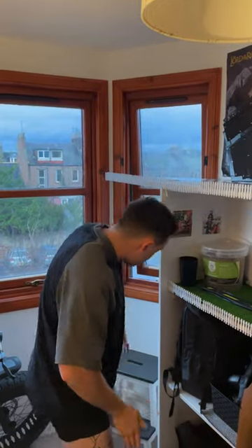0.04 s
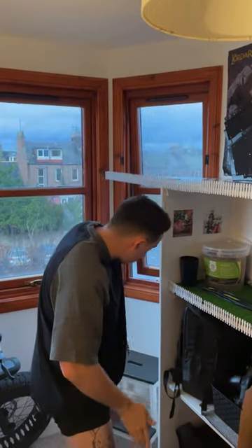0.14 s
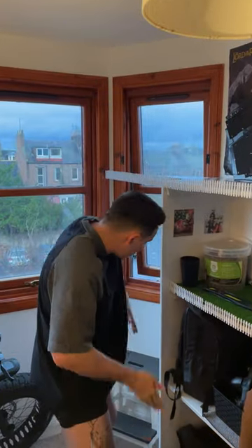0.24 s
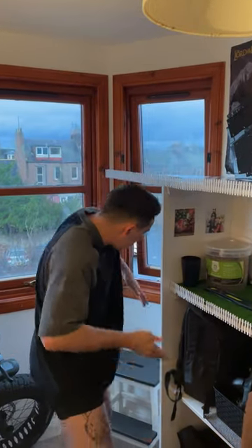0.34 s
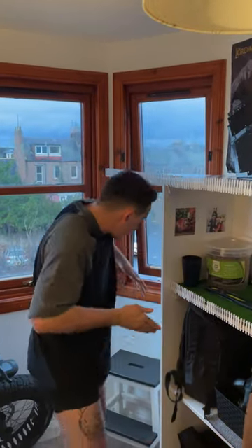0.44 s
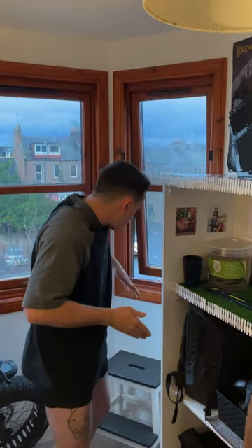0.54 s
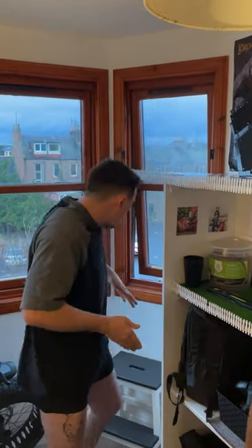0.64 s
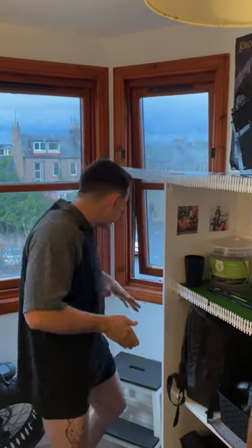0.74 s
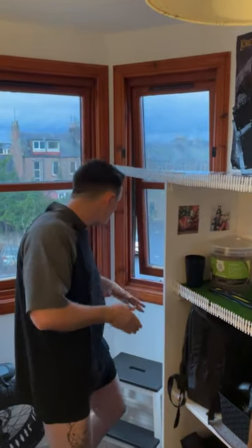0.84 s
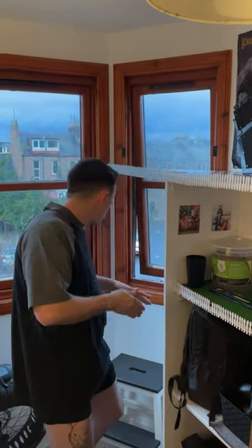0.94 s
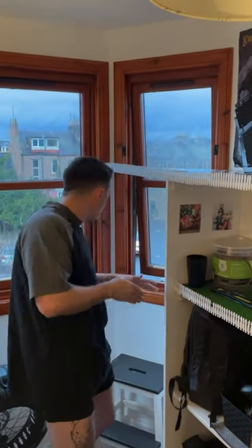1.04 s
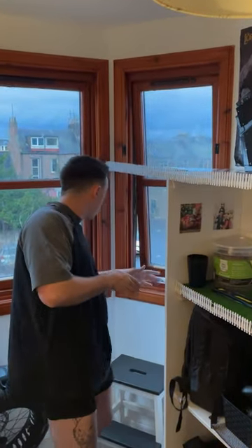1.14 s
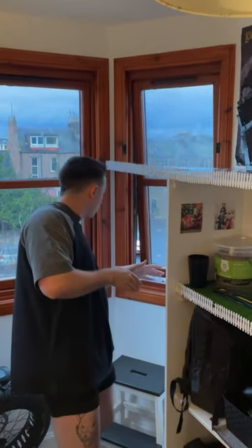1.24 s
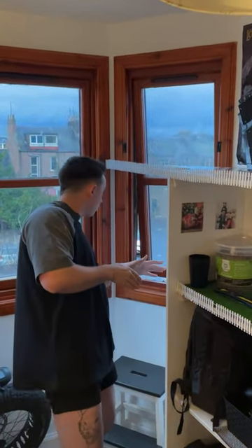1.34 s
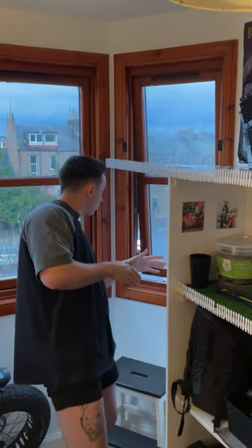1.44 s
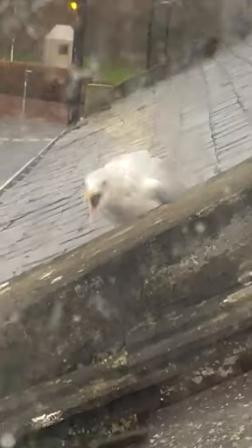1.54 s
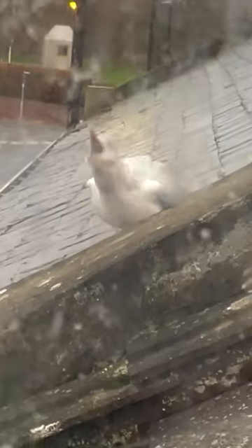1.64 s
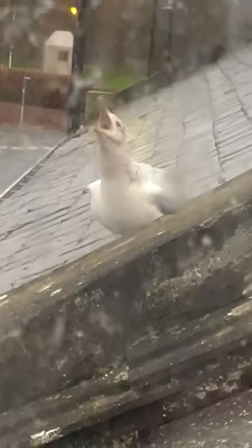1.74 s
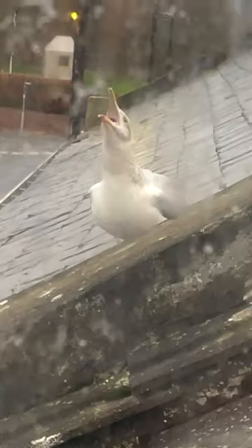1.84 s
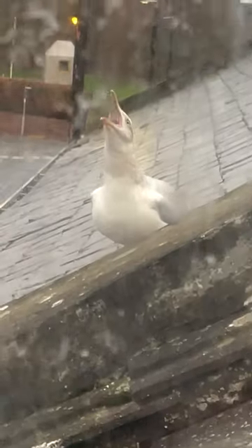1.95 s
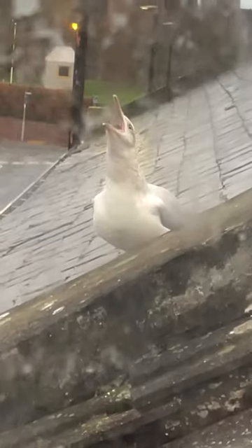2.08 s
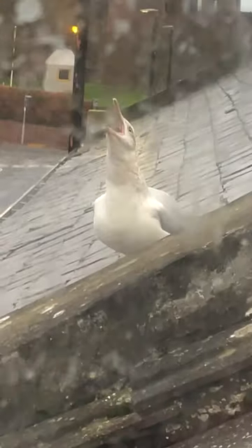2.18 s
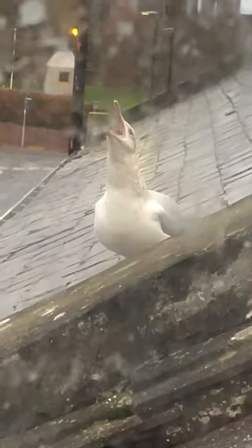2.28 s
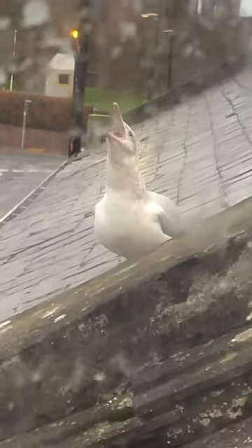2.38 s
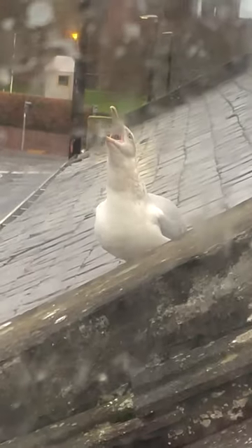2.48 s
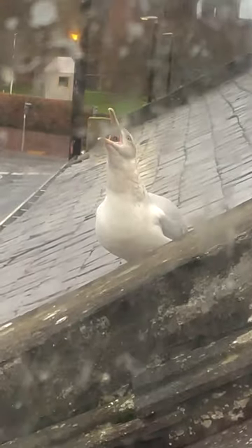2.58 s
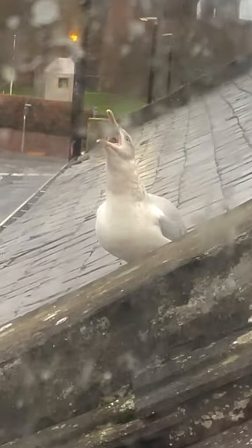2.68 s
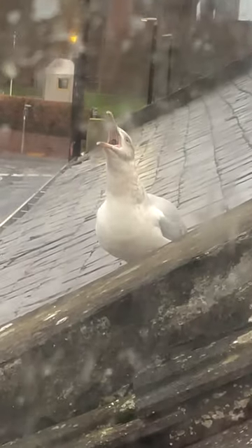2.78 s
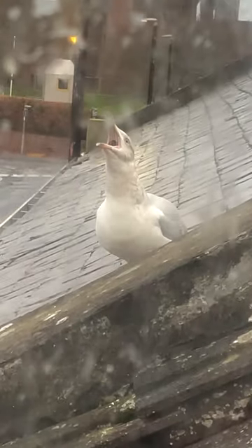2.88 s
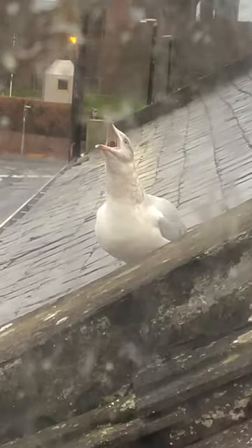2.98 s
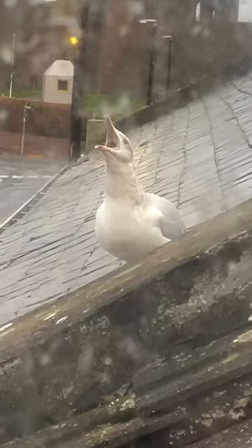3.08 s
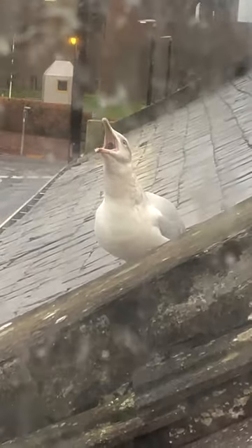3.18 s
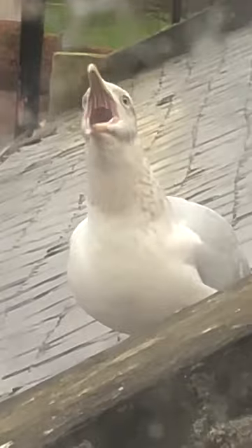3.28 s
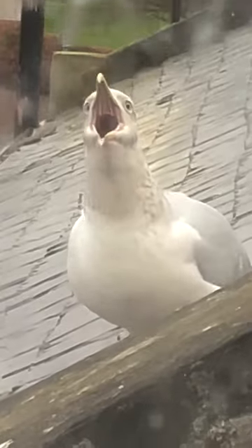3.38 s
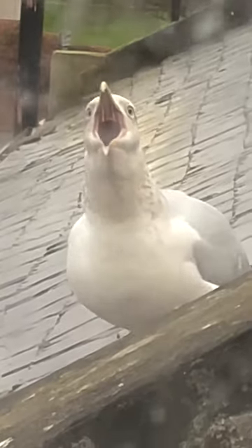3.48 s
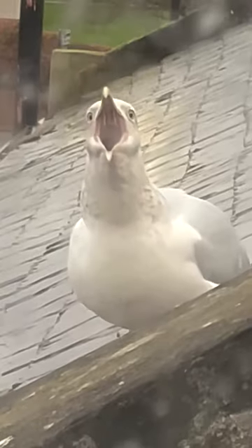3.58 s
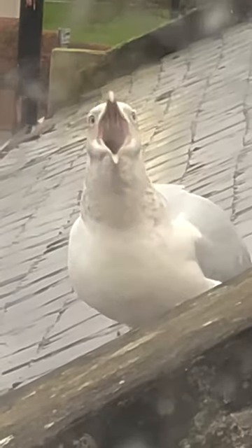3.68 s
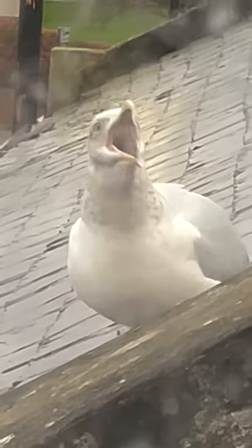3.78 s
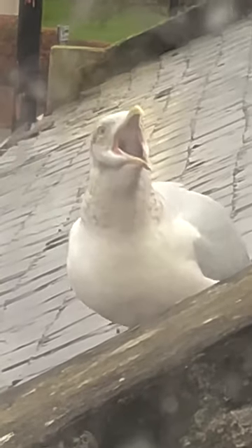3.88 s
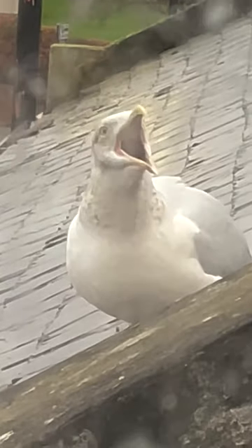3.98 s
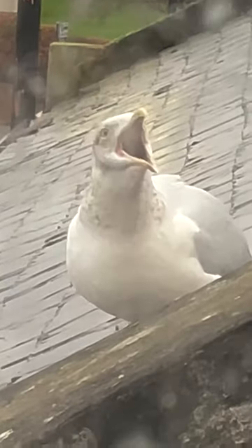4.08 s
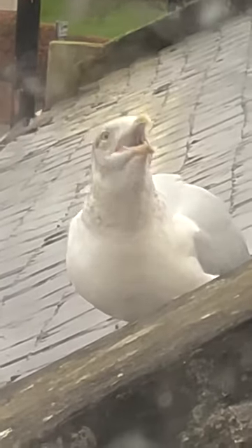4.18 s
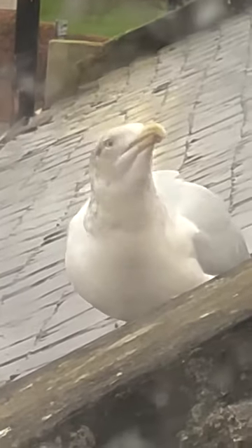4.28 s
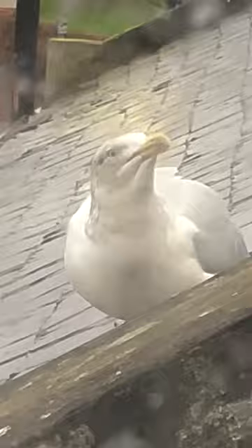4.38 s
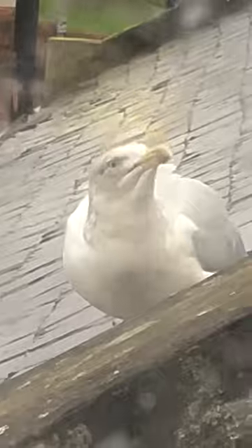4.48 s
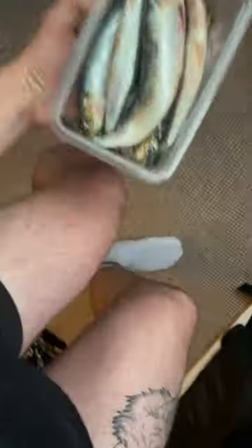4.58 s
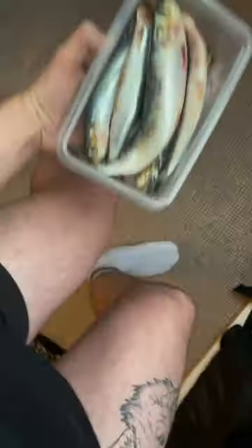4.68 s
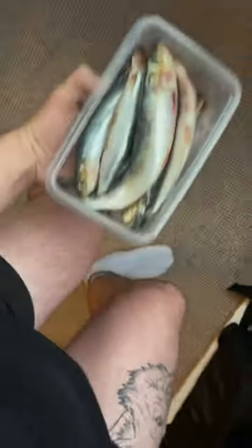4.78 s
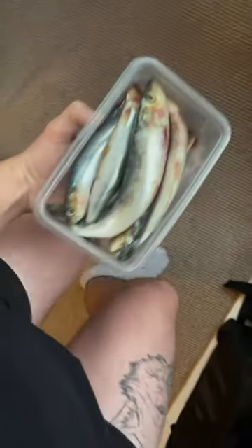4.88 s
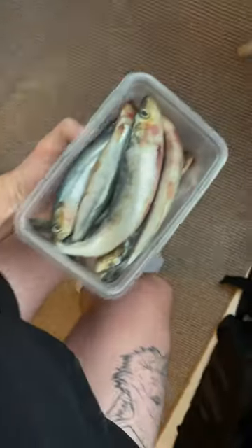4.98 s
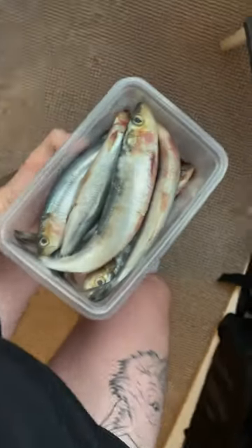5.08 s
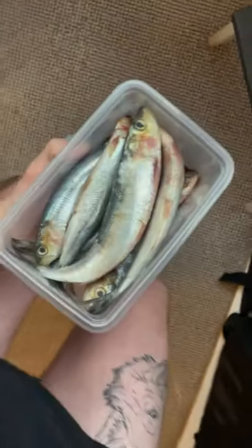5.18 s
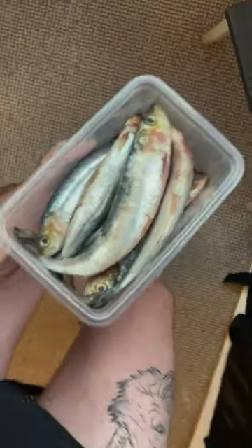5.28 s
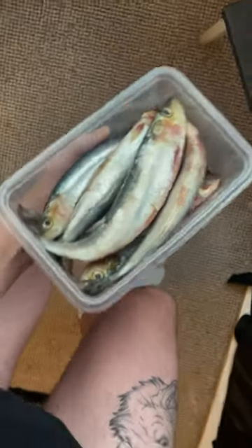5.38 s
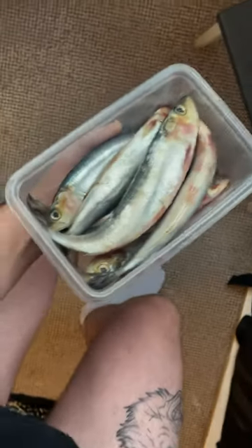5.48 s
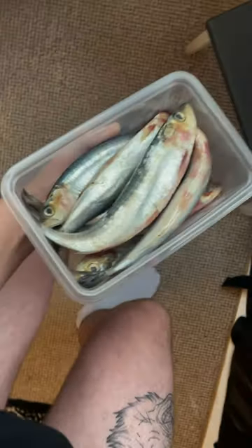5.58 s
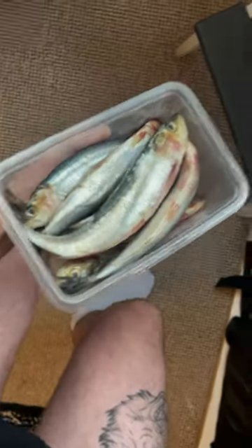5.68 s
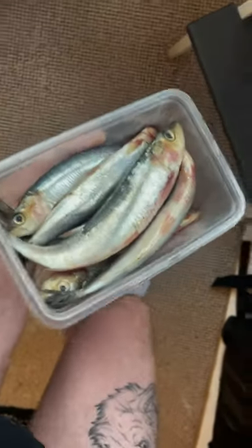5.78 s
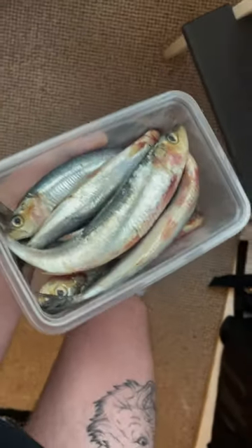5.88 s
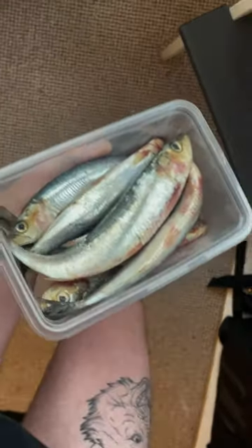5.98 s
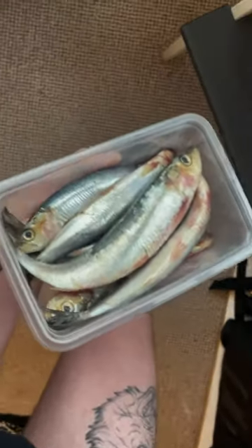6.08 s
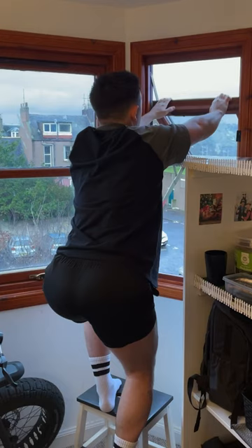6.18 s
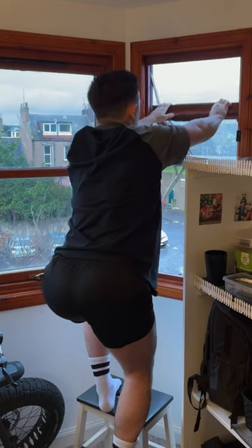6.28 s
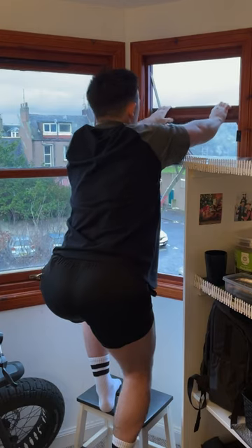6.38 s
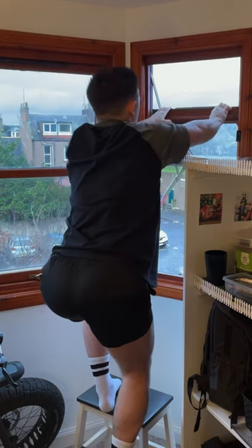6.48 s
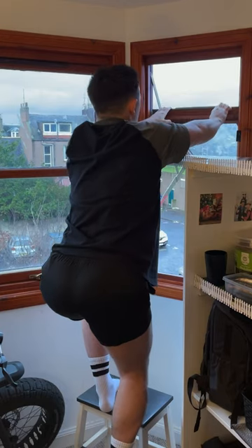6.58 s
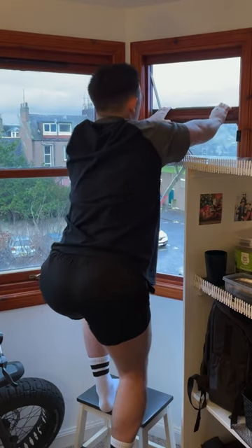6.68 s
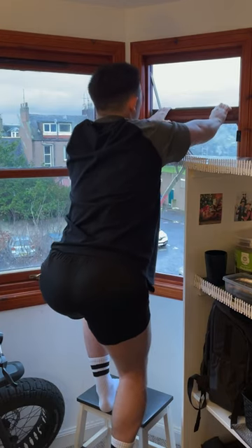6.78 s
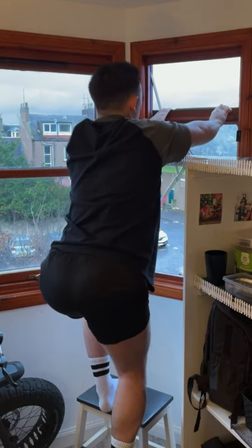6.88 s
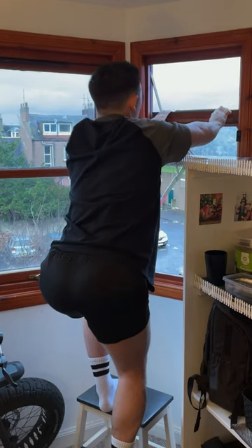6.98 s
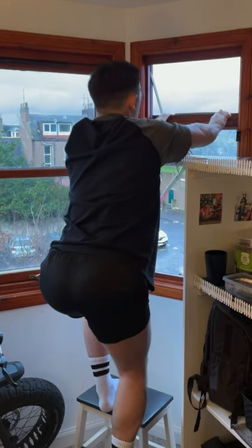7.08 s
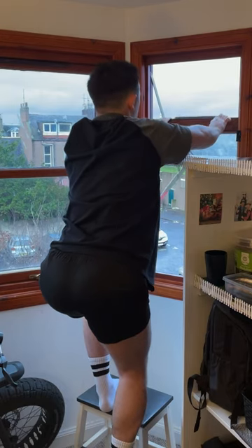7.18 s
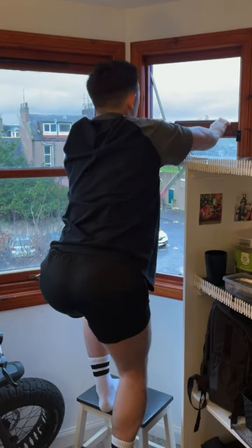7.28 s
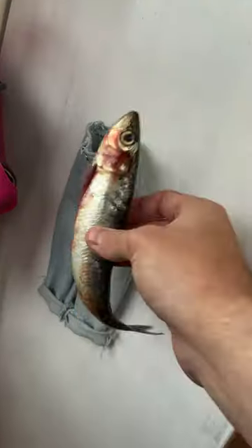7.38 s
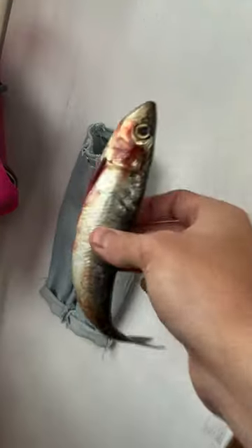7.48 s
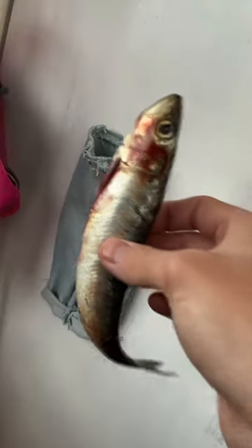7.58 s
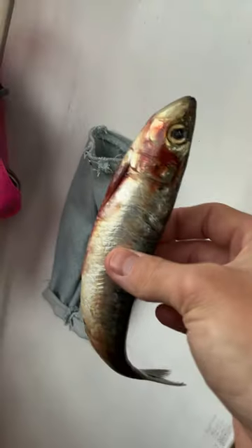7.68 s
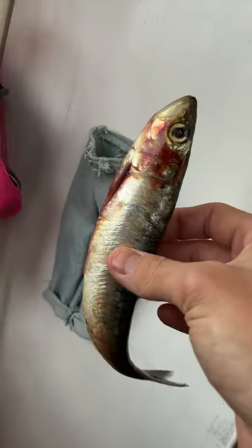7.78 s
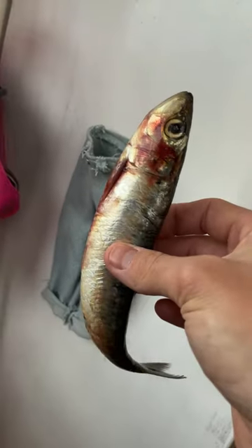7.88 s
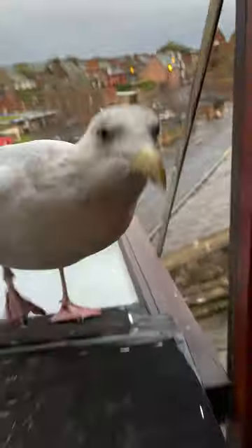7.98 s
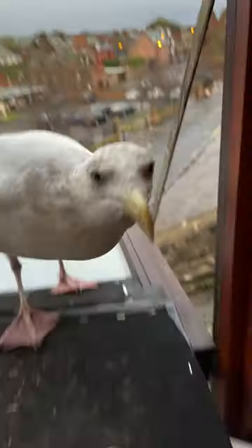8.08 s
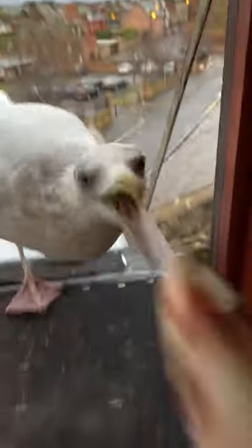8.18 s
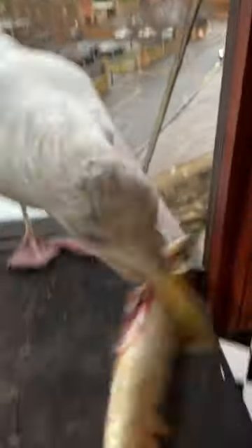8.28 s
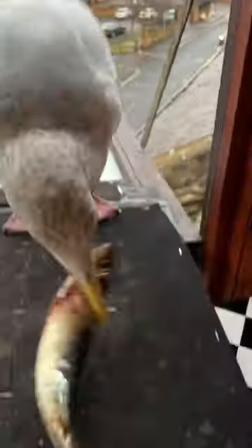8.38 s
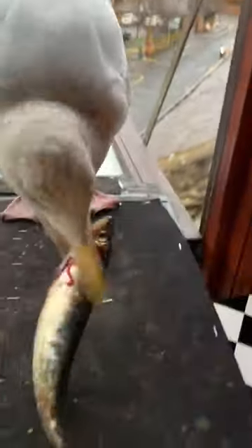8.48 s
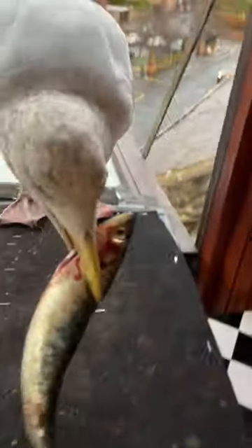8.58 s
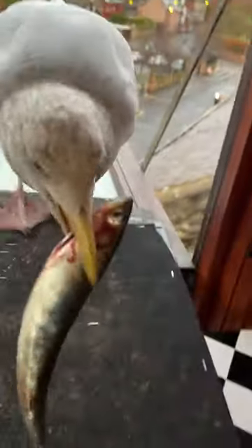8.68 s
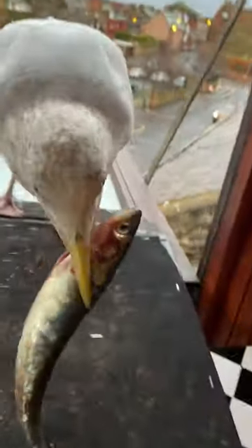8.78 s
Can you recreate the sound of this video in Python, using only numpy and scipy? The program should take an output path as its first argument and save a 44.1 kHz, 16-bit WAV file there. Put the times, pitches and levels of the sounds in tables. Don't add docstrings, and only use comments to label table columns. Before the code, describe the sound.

A phone catches low town rumble and light fabric movement in a room, then a loud gull outside yelping about four times a second, with short throaty croaks before each yelp and echoes from houses. A second gull replies more distantly and lingers after the first stops. Cloth brushes, a window frame groans and rubs open twice, then a bird snatches something with clicks, thuds and rustling at the open sill.

```python
import sys
import numpy as np
from scipy import signal
from scipy.fft import rfft, irfft, next_fast_len
from scipy.io import wavfile
from scipy.ndimage import uniform_filter1d, map_coordinates

SR = 44100
rng = np.random.default_rng(int(sys.argv[2]) if len(sys.argv) > 2 else 0)


def transcribe(u):
    v = np.clip(np.atleast_2d(u).T, -1, 1)
    q = np.round(v * 32767).astype(np.int16)
    wavfile.write(sys.argv[1], SR, q)


def attenuation_scalar(level_db):
    decades = np.asarray(level_db, float) / 20
    return 10 ** decades


N = 390285

# start, low lead-in, hold on top and sag in seconds, lead-in level in dB.
YELPS = [
    (1.621, 0.073, .024, 0.025, -32),
    (1.861, 0.06, 0.0012, 0.038, -25),
    (2.106, 0.054, 0.0011, 0.042, -25.5),
    (2.355, 0.054, .001, 0.041, -24),
    (2.61, 0.046, 0.0012, 0.039, -24),
    (2.865, 0.045, 0.00069, 0.044, -23),
    (3.131, .045, 0.00061, .044, -25.5),
    (3.419, 0.021, 0.0011, 0.049, -31),
    (3.692, 0.013, .023, 0.054, -26.5),
    (4.016, 0.013, 0.03544, 0.066, -24.5),
]
# top in Hz and in dB over the rule, collapse in seconds, collapse in dB over the rule.
EFFORTS = [
    (-30, 0, .02, -3),
    (4, 0, 0.018, -1.5),
    (5, 0, 0.015, 1.5),
    (2.5, 0, 0.0097, -0.5),
    (-1.5, 0.5, 0.033, -3),
    (3, 0.5, 0.017, 1.5),
    (5, 0.5, 0.014, 1.5),
    (4, 0, 0.022, 1),
    (-2, 0, 0.024, 2),
    (-1.5, 0, 0.051, -1),
]
# time in seconds, pitch in Hz, level in dB.
OPENING_NOTE = [
    (1.11, 1269, -26),
    (1.13, 1232, -27.5),
    (1.17, 1241, -24.5),
    (1.22, 1252, -24),
    (1.245, 1272, -31),
    (1.26, 1300, -38),
    (1.282, 1390, -36.5),
]
# time in seconds, pitch in Hz, level in dB.
SQUEAL = [
    (1.292, 1870, -43.5),
    (1.31, 1856, -41.5),
    (1.36, 1886, -52),
    (1.41, 1900, -54.5),
    (1.436, 1892, -50.5),
    (1.447, 1850, -54),
    (1.455, 1782, -38),
    (1.474, 1680, -41.5),
]
# time in seconds, pitch in Hz, level in dB.
SNAP = [
    (1.478, 1011, -30.5),
    (1.488, 976, -36),
]
# multiple of the pitch, level in dB.
SQUEAL_ORDERS = [(1, -1.5), (2, -24.5), (3, -10), (4, -18.5), (5, -16), (6, -29.5), (7, -41)]
# pitch in Hz, level in dB.
SECOND_PARTIAL = [(940, -13.5), (1040, -12.5), (1110, -8), (1200, -4), (1240, 2), (1280, 1.5), (1340, 5)]
# frequency in Hz, level in dB.
BEAK = [(2850, 8.5), (3050, 10), (3250, -15), (3400, -22.5), (3650, -20), (3850, -31.5), (4000, -35.5),
        (4400, -37), (5000, -48), (6200, -44), (7400, -37.5), (8700, -39.5), (10000, -59.5), (11200, -37.5),
        (12600, -64.5), (15000, -80)]
# time in seconds, brightness in dB.
TURN = [
    (1.2, 8.5),
    (1.26, -3.5),
    (1.65, -5),
    (1.7, -7),
    (1.72, 2.5),
    (2, 2),
    (3.2, 2),
    (3.45, 5),
    (4.1, 6.5),
]
# share of the sag from 0 to 1, pitch in Hz from the top, level in dB.
SAG = [
    (.33, -64, -14),
    (.8, -125, -14.5),
    (1, -150, -14.5),
]
# start in seconds, length in seconds, level in dB.
CROAKS = [(1.049, 0.052, -43), (1.476, 0.02, -42), (1.582, 0.041, -40), (1.82, 0.037, -36.5),
          (2.062, 0.034, -34), (2.311, 0.04, -35), (2.561, 0.045, -33.5), (2.816, 0.041, -34.5),
          (3.076, 0.048, -33.5), (3.346, 0.046, -33), (3.63, 0.039, -33.5), (3.953, 0.052, -35.5)]
# start in seconds, length in seconds, pitch in Hz, level in dB.
CATCHES = [(1.08, 0.014, 1218, -39), (1.6, .012, 1130, -42.5), (1.84, 0.01, 1202, -44.5),
           (2.085, 0.01, 1207, -41.5), (2.336, .012, 1209, -42), (2.591, 0.011, 1191, -40.5),
           (2.843, 0.013, 1170, -38), (3.105, 0.011, 1170, -38), (3.379, 0.016, 1207, -36),
           (3.659, 0.015, 1270, -29.5), (3.983, 0.017, 1305, -25.5)]
# frequency in Hz, width in Hz, level in dB.
THROAT = [(374, 47, -13.5), (1114, 55.5, 7.5), (2500, 300, -1), (3230, 480, -13)]

LOW_HZ, DIP_HZ, STRAIN_HZ, TOP_HZ, BROKEN_HZ, SPENT_HZ = 1130.3, 1093, 1232.4, 1338.7, 1046, 931
STRAIN_DB, TOP_DB, BROKEN_DB, SPENT_DB = -26, -21, -28, -38.5
FULL_LEAD_S, SCOOP_HZ, JUMP_S, BREAK_S = .018, 50, 0.0028, 0.004
HELD_DB, TIRE_HZ_PER_S, TIRE_DB_PER_S = 0.5, 440, 43.5
CATCH_RISE_HZ = 30
RASP_DB = 15.5
FLUTTER, FLUTTER_HZ = .22, 1266
FACING_DB_PER_DB = 2.5
SLACK_HZ, SLACK_DB_PER_HZ, OCTAVE_DB_PER_HZ = 1830, 0.2, 0.1219

# start in seconds, whistle in seconds, top in Hz, whistle in dB, yap in dB.
ANSWERS = [
    (2.759, 0.072, 782, -39, -45.5),
    (3.062, 0.074, 797, -39, -46.5),
    (3.365, 0.046, 764, -34, -43.5),
    (3.65, 0.051, 767, -34.5, -43),
    (3.933, 0.054, 761, -36.5, -41),
    (4.227, .053, 761, -36.5, -45.5),
    (4.526, 0.051, 759.5, -40, -48.5),
    (4.834, 0.035, 753, -44, -54.5),
]
# start and end in seconds, first and last pitch in Hz, level in dB.
WHISTLES = [
    (1.79, 1.84, 664, 714, -52.5),
    (1.86, 1.95, 726, 740, -44),
    (2.085, 2.105, 747, 740, -43),
    (2.3, 2.36, 750, 785, -45),
    (2.37, 2.41, 783, 776, -51.5),
    (2.46, 2.585, 574, 589, -41.5),
]
# start and end in seconds, first and last pitch in Hz, level in dB.
DOUBLED = [
    (1.97, 2.07, 711.3, 710, -53),
]
# multiple of the pitch, level in dB.
WHISTLE_ORDERS = [(2, -21.5), (4, -1), (6, -44.5)]
# multiple of the pitch, level in dB.
DOUBLED_ORDERS = [(1, -20), (2, 1), (3, -5), (4, -6), (5, -3.5), (6, -25.5), (8, -32), (10, -31.5),
                  (12, -36.5), (13, -32.5)]
# start and end in seconds, first and last pitch in Hz, level in dB.
GULPS = [
    (4.328, 4.353, 1134, 1037, -43),
    (4.62, 4.647, 1153, 1046, -44.5),
    (4.923, 4.948, 1136, 1020, -56.5),
]
# multiple of the pitch, level in dB.
GULP_ORDERS = [(1, 0), (2, -18), (3, -13)]
# start in seconds, length in seconds, level in dB.
GRUNTS = [
    (4.335, 0.018, -47.5),
    (4.63, 0.028, -55.5),
    (4.928, 0.017, -65),
]
SLIDE_ORDERS, SLIDE_DB = [(2, -2), (4, 1.5), (6, -22), (8, -24)], -4
CLIMB_HZ_PER_S, EASY_S = 450, 0.044
YAP_GAP_S, YAP_S, YAP_FIRST_HZ, YAP_LAST_HZ = 0.02, .04, 692, 661.5

# start and end in seconds,
# first and last pitch in Hz, level in dB.
DISTANT = [
    (.77, .96, 1906, 1956, -68.5),
    (7.59, 7.69, 4460, 4460, -87),
    (7.6, 7.69, 4320, 4300, -85.5),
    (7.8, 7.95, 1595, 1524, -67),
    (7.845, 7.885, 4270, 4330, -72.5),
    (7.88, 7.925, 4340, 4220, -76.5),
    (8.068, 8.09, 3050, 2950, -66),
    (8.07, 8.09, 4200, 4150, -76),
    (8.068, 8.088, 5560, 5520, -76),
]
# delay in seconds, level in dB.
GABLES = [
    (0.012, -25),
    (.07, -18.5),
    (0.122, -19.5),
    (.165, -22.5),
    (.195, -27.5),
]
# delay in seconds, level in dB.
TERRACES = [
    (.07, -30.5),
    (.325, -26.5),
    (.51, -31),
]
# frequency in Hz, time to fall 60 dB in seconds.
ROOFS = [(300, 0.23), (1200, 0.35), (3000, 0.18), (4400, 0.51), (5200, 0.085), (9000, 0.053)]
# frequency in Hz, level in dB.
SLATES = [(3800, -2), (4100, 11.5), (4500, 6), (4900, 6.5)]
TERRACE_OCTAVE_DB, SMEAR_S = -12, 0.018

# time in seconds, peak, thud and ring in dB, tilt in dB per octave.
TAPS = [(8.138, -33, -52, -4, 0), (8.1438, -26, -28.5, -0.5, 0.5), (8.25, -46, -60, -15, 1.5),
        (8.2568, -41.5, -16.5, 9.5, -2), (8.2691, -41.5, -21.5, 1, 0), (8.285, -54, -27, -10, 1),
        (8.2986, -28.5, -24, 6, 1.5), (8.3512, -27.5, -38, 0, -5.5), (8.3953, -38.5, -51, -17, 4.5),
        (8.4186, -51, -48, 3, -9.5), (8.4458, -39, -39, 6, 1.5), (8.5334, -53.5, -60, 0, -1.5),
        (8.5658, -41.5, -44, -2, 3), (8.579, -43.5, -58, -6, 3), (8.591, -43.5, -39, -11, 7),
        (8.6066, -41.5, -39.5, -13, 7), (8.6787, -46.5, -62, -12, 1), (8.702, -52, -52, 0.5, -5),
        (8.711, -54, -63, -12, 3), (8.7317, -46.5, -61, -17, 2.5), (8.7708, -49, -62, -4, -1),
        (8.788, -49, -60, -8, -1), (8.794, -29.5, -52, -4, -1), (8.812, -33.5, -40.5, 0.5, -0.5),
        (8.823, -43, -51, -14, 6), (8.843, -47, -55, -10, -0.5)]
# frequency in Hz, level in dB, time to fall 60 dB in seconds.
PANE = [(1170, 4, 0.032), (2580, -1, 0.02), (3300, -4, 0.013), (4200, -25, 0.016), (5500, -22, 0.0074),
        (7600, -28, 0.0053)]
# frequency in Hz, width in Hz, level in dB.
SILL = [(85.4, 36, -4.5), (133.5, 29, -2.5), (370, 55, -3), (1080, 260, -29)]
SILL_LEAN_DB, SILL_FROM_S = .9, 7.95

# start, hardest moment and letting go in seconds, frame in dB, rub in dB.
SASH = [
    (5.569, 6.223, 6.38, -34.5, -43.5),
    (6.79, 6.83, 6.74, -51.5, -85),
    (6.808, 7.285, 7.45, -37, -50.5),
]
# frequency in Hz, level in dB per Hz.
FRAME = [(60, -14.5), (140, 3.5), (175, -8), (220, 2), (290, -5.5), (350, -4.5), (520, -10), (800, -25),
         (1300, -27), (2000, -65), (9000, -100)]
# frequency in Hz, level in dB per Hz.
RUB = [(400, -12), (700, -4.5), (1330, -11), (1740, -14), (5500, -19), (8600, -22.5), (12500, -23.5),
       (14700, -42), (15500, -70)]
RELEASE_S, STOP_S = 0.21, 7.53
SASH_SHOT = slice(5 * SR, 8 * SR)

# start in seconds, length in seconds, level in dB.
CLOTH = [(.0, 0.015, -70.5), (0.082, 0.088, -70), (0.274, 0.35, -68.5), (0.366, 0.078, -59.5),
         (0.524, 0.11, -59), (0.695, 0.083, -66), (1.42, 0.0071, -55), (5.375, 0.062, -57.5),
         (5.41, 0.046, -62.5), (5.445, 0.058, -68.5), (6.574, 0.073, -64.5), (6.672, 0.069, -69),
         (6.763, 0.047, -73), (7.025, 0.021, -52.5), (8, 0.027, -78), (8.07, 0.015, -70),
         (8.133, 0.049, -49), (8.244, 0.056, -55.5), (8.299, 0.02, -38), (8.312, 0.033, -43.5),
         (8.338, 0.049, -44), (8.394, 0.058, -55.5), (8.434, 0.047, -51.5), (8.574, 0.053, -60),
         (8.748, 0.063, -56), (8.835, 0.0091, -55)]
# start in seconds, length in seconds, level in dB.
SCUFFS = [
    (6.815, 0.026, -70.5),
    (6.854, 0.052, -50),
]
# frequency in Hz, level in dB per Hz.
RUSTLE = [(400, -41.5), (800, -16.5), (1300, -7), (2400, -6.5), (6300, -12.5), (9000, -8), (12000, -7.5),
          (13300, -21), (14300, -35.5), (15200, -59)]

# time in seconds, level in dB.
TOWN = [(0, -71), (.7, -69.5), (1.05, -56), (2, -54.5), (2.9, -58), (3.7, -56.5), (4.6, -57), (5.1, -70),
        (5.6, -75), (6.7, -66.5), (7.55, -57), (7.9, -58.5), (8.05, -45), (8.2, -40.5), (8.3, -34.5),
        (8.55, -44), (8.85, -40.5)]
# frequency in Hz, level in dB per Hz.
RUMBLE = [(20, -47), (32, -23), (45, 0), (62, -2.5), (90, -4), (130, -21), (200, -57), (1500, -110)]
# frequency in Hz, level in dB per Hz.
DRONE = [(70, -28.5), (130, 2), (200, -8), (400, -16.5), (800, -23.5), (1500, -58.5), (7000, -110)]
# frequency in Hz, level in dB per Hz.
HISS = [(180, -41.5), (300, -4.5), (351, -13), (1030, -4.5), (1320, -8), (2840, -25), (4200, -33.5),
        (4700, -37.5), (9000, -34.5), (11700, -72), (19800, -120)]
# start and end in seconds, first and last pitch in Hz, level in dB.
HUMS = [
    (.02, .3, 59, 59.8, -56.5),
    (.62, .82, 69.8, 70, -49.5),
    (1.7, 2.55, 151.3, 152.8, -60),
]
# time in seconds, level in dB.
TREADS = [
    (0, -51.5),
    (.62, -54),
]
# from and to in seconds, rumble in dB, drone in dB.
STOOL = (6, 7.5, -52.5, -59.5)
TREAD_RISE_S, TREAD_T60_S = 0.075, 0.83
RUMBLE_DB, RUMBLE_GROWS, HISS_DB, HISS_GROWS = -58.5, 0.75, -66, 0.84

# frequency in Hz, left-right likeness from 0 to 1.
ALIKE = [(100, .9995), (180, .99), (350, .91), (700, .84), (1500, .8), (5000, .82), (9100, .999),
         (11000, .999), (13000, .93)]
# frequency in Hz, radians the left port leads.
PORTS = [(700, 0), (1150, -.3), (2300, .5), (4800, .6), (7000, 1.2), (9150, 3.11), (11000, 3.17),
         (12000, 4.1), (13600, 5.6), (15800, 6.4)]
# frequency in Hz, left over right in dB.
LEAN = [(500, 0), (800, 1.3), (1000, .6), (1200, -1.4), (1700, -.5), (2300, 0)]
LEFT_RIGHT = np.array([[1], [-1]])


def unit(x):
    return x / np.sqrt(np.mean(x ** 2) + 1e-20)


def along(points, hz):
    f, v = np.transpose(points)
    return np.interp(np.log(hz + 1), np.log(f + 1), v)


def curves(rows, fade):
    s, *cols = np.transpose(rows)
    s = np.r_[s[0] - fade, s, s[-1] + fade]
    return [np.interp(np.arange(N) / SR, s, np.r_[-120, c, -120]) for c in cols]


def wobble(rate, size=N):
    knots = rng.standard_normal(int(size * rate / SR) + 4)
    return map_coordinates(knots, [np.arange(size) * rate / SR])


def filtered(x, response):
    m = next_fast_len(x.shape[-1] + SR // 2 + 2048)
    return irfft(rfft(x, m) * response(np.fft.rfftfreq(m, 1 / SR)), m)[..., :x.shape[-1]]


def resonances(modes):
    def response(f):
        total = 0
        for k, (c, w, db) in enumerate(modes):
            total = total + (-1) ** k * attenuation_scalar(db) * 1j * f * w / (c * c - f * f + 1j * f * w)
        return total
    return response


def rush(spectrum, spiky_db, patchy_db, size=N):
    raw = rng.standard_normal((2, size)) * attenuation_scalar(spiky_db * wobble(700, size=size))
    z = signal.stft(raw, nperseg=512)[2]
    field = rng.standard_normal(z.shape[1:])
    field = uniform_filter1d(uniform_filter1d(field, 6, 0), 8, 1)
    pair = signal.istft(z * attenuation_scalar(patchy_db * unit(field)), nperseg=512)[1][:, :size]

    def spread(hz):
        angle = np.arccos(np.clip(along(ALIKE, hz), -1, 1)) / 2
        return attenuation_scalar(along(spectrum, hz)) * [np.cos(angle), np.sin(angle)]
    mid, side = filtered(pair, spread)
    return unit(np.array([mid + side, mid - side]))


def add(track, start, sound):
    track[round(start * SR):][:len(sound)] += sound


def note(rows, edge, jitter):
    s, *cols = np.transpose(rows)
    t = np.arange(s[0] - edge, s[-1] + edge, 1 / SR)
    hz, *rest = [uniform_filter1d(np.interp(t, s, c), size=130) for c in cols]
    phase = 2 * np.pi * np.cumsum(hz * (1 + jitter * wobble(260, size=len(t)))) / SR
    fade = np.clip(np.minimum(t - t[0], t[-1] - t) / edge, 0, 1) ** 2
    return t, phase, fade, hz, rest


def yelp(start, lead, hold, sag, lead_db, lift_hz, lift_db, tail, tail_db):
    jump, extra = start + lead, hold + sag - .04
    top_hz = TOP_HZ - TIRE_HZ_PER_S * extra + lift_hz
    top_end, low = jump + hold, jump + hold + sag + BREAK_S
    rows = [(start, LOW_HZ, lead_db), (start + .45 * lead, DIP_HZ, lead_db), (jump - JUMP_S, STRAIN_HZ, STRAIN_DB)]
    if lead < FULL_LEAD_S:
        rows = [(start, top_hz - SCOOP_HZ, lead_db)]
    rows += [(jump, top_hz, TOP_DB), (top_end, top_hz, TOP_DB + HELD_DB * (hold > .01))]
    for share, hz, db in SAG:
        tired_db = TIRE_DB_PER_S * extra * (.5 + share)
        rows.append((top_end + share * sag, top_hz + hz, db + lift_db - tired_db))
    collapse = [(low, BROKEN_HZ, BROKEN_DB + tail_db),
                (low + 0.45 * tail, SPENT_HZ + 15, BROKEN_DB + tail_db - 3.5),
                (low + tail, SPENT_HZ, SPENT_DB + tail_db)]
    return [rows, collapse]


def sung(rows):
    t, phase, fade, hz, (db,) = note(rows, edge=0.007, jitter=0.0035)
    size = len(t)
    turn_db = np.interp(t, *np.transpose(TURN))
    second_db = along(SECOND_PARTIAL, hz) + turn_db
    first = attenuation_scalar(db) * np.sqrt(2 / (1 + attenuation_scalar(2 * second_db)))
    voice = np.sin(phase) + attenuation_scalar(second_db) * np.sin(2 * phase - .4)
    for k in range(3, 12):
        if k == 3:
            facing_db = FACING_DB_PER_DB * (hz > STRAIN_HZ) * np.maximum(turn_db - 4, 0) * (t > 2)
            effort_db = facing_db - 12 * (t < SQUEAL[0][0])
        else:
            effort_db = .9 * (db + 17 + turn_db) + RASP_DB * (hz < 1060)
        level_db = second_db + along(BEAK, k * hz) + effort_db + 2.4 * wobble(60, size=size)
        voice += attenuation_scalar(level_db) * np.sin(k * phase + k)
    cracked = np.clip(np.abs(np.gradient(hz)) / 0.81, 0, 1) ** 2
    cracked = np.maximum(cracked, .45 * (hz < 1060))
    flutter = 0.1 + FLUTTER * np.clip((FLUTTER_HZ - hz) / 70, 0, 1)
    shake = flutter * np.tanh(wobble(120, size=size)) + .5 * cracked * wobble(350, size=size)
    breath = attenuation_scalar(-35) * np.diff(rng.standard_normal(size + 1)) * (1 + np.sin(phase))
    breath = uniform_filter1d(uniform_filter1d(breath, size=3), size=4)
    return t[0], first * fade * (voice * (1 + shake) + (1 + 4.5 * cracked) * breath)


def squeal():
    t, phase, fade, hz, (db,) = note(SQUEAL, edge=0.0057, jitter=0.0018)
    slack_hz = np.minimum(hz - SLACK_HZ, 0)
    stack = 0
    for k, level in SQUEAL_ORDERS:
        slope = SLACK_DB_PER_HZ * (k > 2) - OCTAVE_DB_PER_HZ * (k == 2)
        stack = stack + attenuation_scalar(level + slope * slack_hz + 1.6 * wobble(23, size=len(t))) * np.sin(k * phase)
    return t[0], 2.1 * attenuation_scalar(db) * fade * stack


def yelps():
    out = np.zeros(N + SR)
    notes = [OPENING_NOTE, SNAP]
    for s, length, hz, db in CATCHES:
        notes.append([(s, hz, db - 3), (s + .5 * length, hz + CATCH_RISE_HZ, db), (s + length, hz, db - 2.5)])
    for row, more in zip(YELPS, EFFORTS):
        notes += yelp(*row, *more)
    for rows in notes:
        add(out, *sung(rows))
    add(out, *squeal())
    return out[:N]


def croaks(table, pulse_hz):
    drive = np.zeros(N + SR)
    for start, length, db in table:
        u = np.arange(round(length * SR)) / (length * SR)
        beat = np.cumsum(pulse_hz * attenuation_scalar(1.7 * wobble(120, size=len(u)))) / SR
        pulses = np.diff(np.floor(beat), prepend=0) * attenuation_scalar(2.8 * wobble(300, size=len(u)))
        puff = .04 * rng.standard_normal(len(u)) * attenuation_scalar(4 * wobble(250, size=len(u)))
        swell = np.clip(u / 0.08, 0, 1) * (0.17 + u) * np.clip((1 - u) / 0.42, 0, 1)
        add(drive, start, attenuation_scalar(db + 22.5) * swell * unit(pulses + puff))

    def throat(hz):
        return resonances(THROAT)(hz) / (1 + (hz / 4400) ** 6) ** .5 + attenuation_scalar(-41.5) / (1 + (hz / 7000) ** 8)
    return filtered(drive[:N], throat)


def answers():
    high, yaps, slides = [], [], []
    for s, length, top_hz, whistle_db, yap_db in ANSWERS:
        end = s + length
        yap = end + YAP_GAP_S
        high.append((s, end, top_hz - CLIMB_HZ_PER_S * length * length / EASY_S, top_hz, whistle_db))
        yaps.append((yap, yap + YAP_S, YAP_FIRST_HZ, YAP_LAST_HZ, yap_db))
        slides.append((end - .008, yap + .014, top_hz, YAP_FIRST_HZ, yap_db + SLIDE_DB))
    out = cries(slides, SLIDE_ORDERS, jitter=0.0026)
    out += cries(GULPS, GULP_ORDERS, jitter=0.011)
    out += cries(WHISTLES + high, WHISTLE_ORDERS, jitter=0.0069, droop=0.014)
    out += cries(DOUBLED + yaps, DOUBLED_ORDERS, jitter=0.0022)
    return out + croaks(GRUNTS, pulse_hz=368.4)


def cries(table, orders, jitter, droop=0):
    out = np.zeros(N + SR)
    for start, end, first_hz, last_hz, db in table:
        rows = [(start + 0.0034, first_hz, db - 2.0),
                (start + 0.88 * (end - start), last_hz, db),
                (end - .006, last_hz * (1 - droop), db + 0.5)]
        t, phase, fade, hz, (level_db,) = note(rows, edge=0.0075, jitter=jitter)
        stack = 0
        for k, share_db in orders:
            stack = stack + attenuation_scalar(share_db + (1 + .22 * k) * wobble(50, size=len(t))) * np.sin(k * phase + k)
        add(out, t[0], 1.72 * attenuation_scalar(level_db) * fade * stack)
    return out[:N]


def taps():
    click, blows, t = np.zeros(N + SR), np.zeros(N), np.arange(SR // 8) / SR
    for s, db, thud_db, ring_db, tilt_db in TAPS:
        ring = 0
        for hz, level, t60 in PANE:
            decay = attenuation_scalar(level + ring_db + rng.normal(0, 3.4) - 60 * t / t60)
            ring = ring + decay * np.sin(2 * np.pi * hz * (1 + rng.normal(0, 0.044)) * t)
        crack = (attenuation_scalar(-60 * t / 0.009) + 0.053 * attenuation_scalar(-60 * t / 0.12)) * rng.standard_normal(len(t))
        hit = np.clip(t / 0.00022, 0, 1) * (0.29 * ring + crack)
        tilted = filtered(hit, lambda hz: attenuation_scalar(tilt_db * np.log2((hz + 600) / 5000)))
        add(click, s, attenuation_scalar(db - 2.5) * tilted)
        add(blows, s, attenuation_scalar(thud_db + 20.5) * np.hanning(40))
    soft = filtered(click[:N], lambda hz: attenuation_scalar(along(RUSTLE, np.minimum(hz, 14000)) * .5))
    return attenuation_scalar(11.5 + SILL_LEAN_DB * LEFT_RIGHT) * soft + filtered(blows, resonances(SILL))


def pushes(column, quick, rise_db, sag_db, fall_db):
    t, gain = np.arange(N) / SR, np.zeros(N)
    for row in SASH:
        start, hardest, free = row[:3]
        early = np.clip(1 - (t - start) / (quick * (hardest - start)), 0, None)
        late = np.clip((t - hardest) / (free - hardest), 0, 1)
        after = np.clip(t - free, 0, 1) / RELEASE_S
        gain += attenuation_scalar(row[column] - rise_db * early ** 2 - sag_db * late - fall_db * after ** 2)
    return gain * np.clip((STOP_S - t) / 0.06 + 1, 0, 1)


def sash():
    frame = pushes(column=3, quick=.99, rise_db=32, sag_db=2.1, fall_db=28)[SASH_SHOT]
    rub = pushes(column=4, quick=.75, rise_db=36, sag_db=5.5, fall_db=30)[SASH_SHOT]
    size = len(rub)
    judder_db, out = 0.88 * wobble(35, size=size), np.zeros((2, N))
    out[:, SASH_SHOT] = frame * attenuation_scalar(judder_db) * rush(FRAME, spiky_db=2.5, patchy_db=1.0, size=size)
    out[:, SASH_SHOT] += rub * attenuation_scalar(4.0 + 0.78 * judder_db) * rush(RUB, spiky_db=-0.5, patchy_db=2.0, size=size)
    return out


def brushes(table):
    gain = np.zeros(N + SR)
    for start, length, db in table:
        u = np.arange(round(3 * length * SR)) / (length * SR)
        add(gain, start, attenuation_scalar(db + 4.5) * (1 - np.exp(-u / 0.068)) * np.exp(-(1.54 * u) ** 2))
    return gain[:N]


def cloth():
    crackle = attenuation_scalar(2.9 * wobble(97)) * rush(RUSTLE, spiky_db=-1.5, patchy_db=1.5)
    dull = uniform_filter1d(uniform_filter1d(brushes(SCUFFS) * crackle, size=5), size=4)
    return (brushes(CLOTH) + attenuation_scalar(-82.0)) * crackle + dull


def walls(table, hz):
    spread = rng.random((len(table), 6)) * SMEAR_S
    size = rng.standard_normal((len(table), 6))
    total = 0
    for (s, db), late, row in zip(table, spread, size):
        for d, g in zip(late, row):
            total = total + attenuation_scalar(db) * g / np.linalg.norm(row) * np.exp(-2j * np.pi * hz * (s + d))
    return total


def gables(x):
    return filtered(x, lambda hz: walls(GABLES, hz) / (1 + (hz / 3500) ** 4)) * attenuation_scalar(3 * wobble(45))


def terraces(x):
    def response(hz):
        lowest = 1 / (1 + (hz / 1600) ** 8)
        octave = attenuation_scalar(TERRACE_OCTAVE_DB) / (1 + (hz / 2900) ** 12)
        return walls(TERRACES, hz) * (lowest + octave)
    return filtered(x, response) * attenuation_scalar(2.9 * wobble(35))


def roofs(x):
    out, step = np.zeros((2, N + 2 * SR)), SR // 4
    blend = np.convolve(np.ones(step), np.hanning(2048) / np.hanning(2048).sum())
    x = filtered(x, lambda hz: attenuation_scalar(along(SLATES, hz)))
    x = np.pad(x, (2048, 2 * step))
    for i in range(2 * step, 21 * step, step):
        hz, t, z = signal.stft(rng.standard_normal((2, SR // 2)), SR, nperseg=256)
        tail = signal.istft(z * attenuation_scalar(-60 * t / along(ROOFS, hz)[:, None]), SR, nperseg=256)[1]
        tail[1] = .3 * tail[0] + .95 * tail[1]
        piece = x[None, i + 2048:][:, :len(blend)] * blend
        wet = signal.fftconvolve(piece, tail / np.linalg.norm(tail[0]), axes=1)
        out[:, i + 200:][:, :wet.shape[1]] += wet
    return out[:, :N] * attenuation_scalar(3.5 * wobble(40))


def town():
    level_db, = curves(TOWN, fade=.1)
    t = np.arange(N) / SR
    braced = np.clip(np.minimum(t - STOOL[0], STOOL[1] - t) / 0.042 + 1, 0, 1)
    treads = 0
    for s, db in TREADS:
        rise = np.clip((t - s) / TREAD_RISE_S + 1, 0, 1)
        treads = treads + attenuation_scalar(db - 60 * np.abs(t - s) / TREAD_T60_S) * rise
    low = attenuation_scalar(RUMBLE_DB + RUMBLE_GROWS * (level_db + 56.5)) + attenuation_scalar(-75.5) + treads + attenuation_scalar(STOOL[2]) * braced
    drone = attenuation_scalar(level_db) + attenuation_scalar(STOOL[3]) * braced
    hiss = attenuation_scalar(HISS_DB + HISS_GROWS * (level_db + 57))
    out = low * attenuation_scalar(3.5) * rush(RUMBLE, spiky_db=-3.5, patchy_db=2.0)
    out += drone * rush(DRONE, spiky_db=-4.0, patchy_db=4.0)
    return out + attenuation_scalar(4.0) * hiss * rush(HISS, spiky_db=-0.4, patchy_db=3.0)


def scene():
    near = yelps() + croaks(CROAKS, pulse_hz=419.3)
    far = answers() + cries(DISTANT, [(1, -2.5), (2, -27)], jitter=0.0031)
    echoes = gables(attenuation_scalar(-21.5) * near + attenuation_scalar(2.5) * far) * attenuation_scalar(1.5 * LEFT_RIGHT)
    echoes += roofs(attenuation_scalar(-16.5) * near + attenuation_scalar(-9.5) * far)
    echoes += terraces(near)
    gulls = near * attenuation_scalar(-.15 * LEFT_RIGHT) + far + echoes
    at_sill = np.arange(N) / SR > SILL_FROM_S
    handled = taps() + cloth() * attenuation_scalar(SILL_LEAN_DB * LEFT_RIGHT * at_sill)
    engines = cries(HUMS, [(0.87, 0.0029)], jitter=0.086)
    return gulls + handled + town() + engines + sash()


def low_pass(x):
    return signal.sosfilt(signal.butter(12, 16310, fs=SR, output="sos"), x)


def record(dry):
    def ports(hz):
        lead = np.exp(.5j * along(PORTS, hz) * LEFT_RIGHT)
        lean = attenuation_scalar(.5 * along(LEAN, hz) * (hz < 6000) * LEFT_RIGHT)
        return lead * lean * (hz < 16300) / (1 + (hz / 15200) ** 24)
    spaced = filtered(dry, ports)
    return low_pass(spaced)


dry = scene()
out = record(dry)
transcribe(out)
```